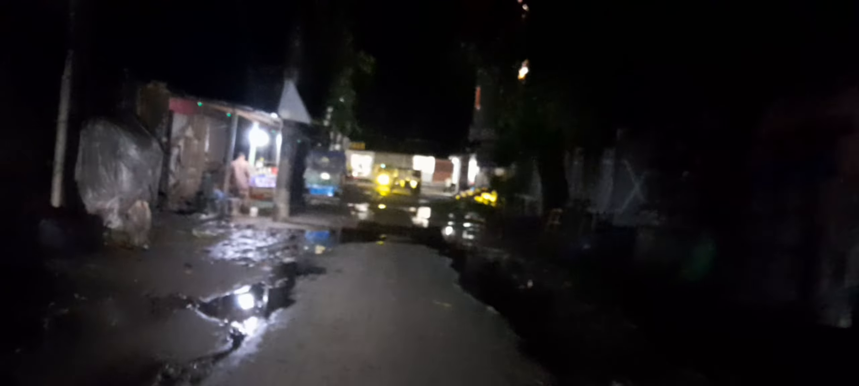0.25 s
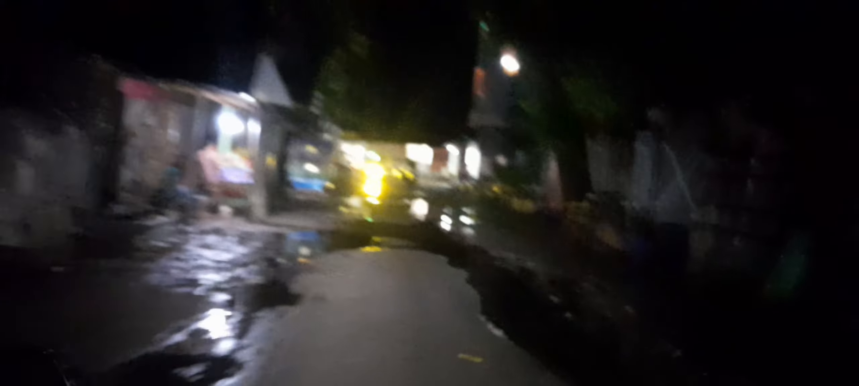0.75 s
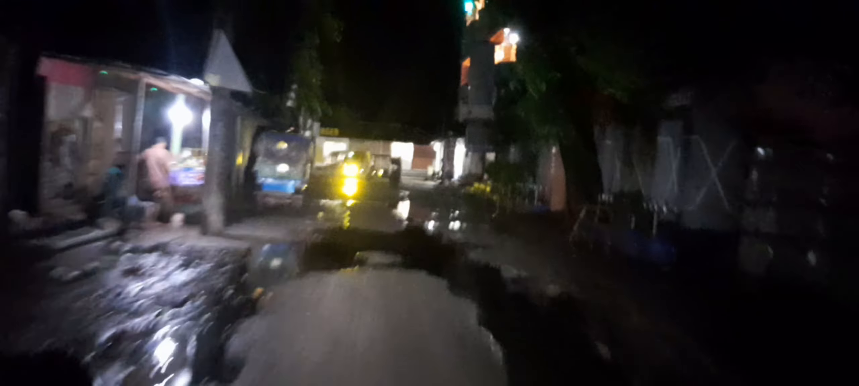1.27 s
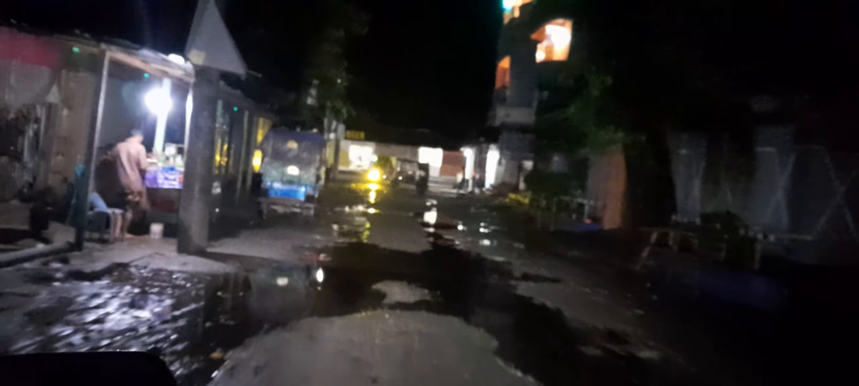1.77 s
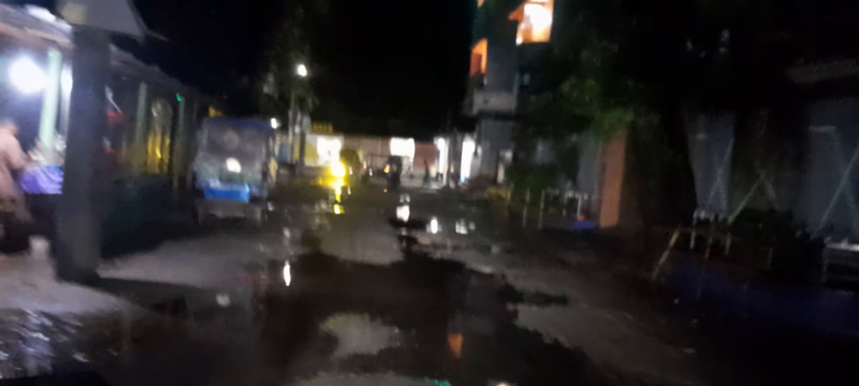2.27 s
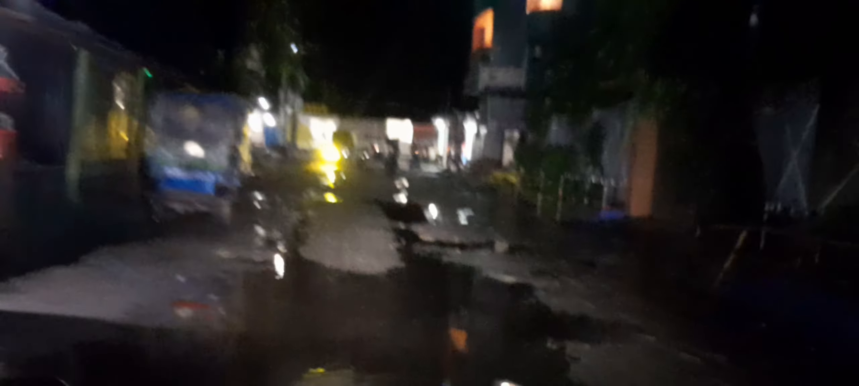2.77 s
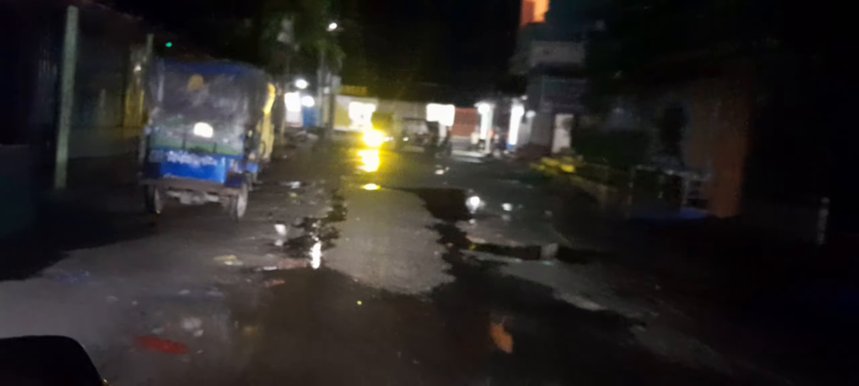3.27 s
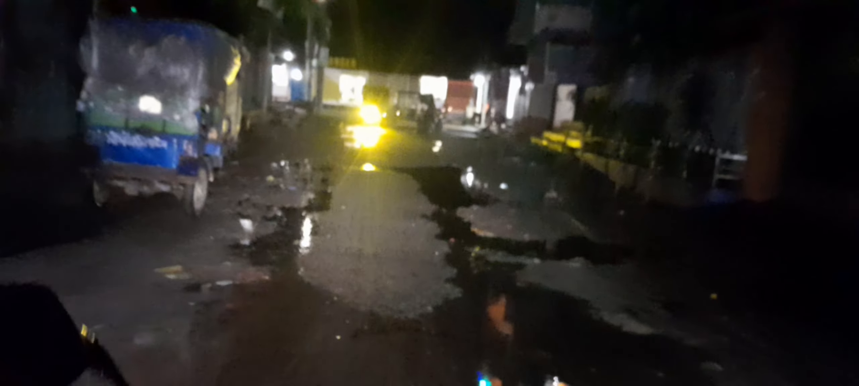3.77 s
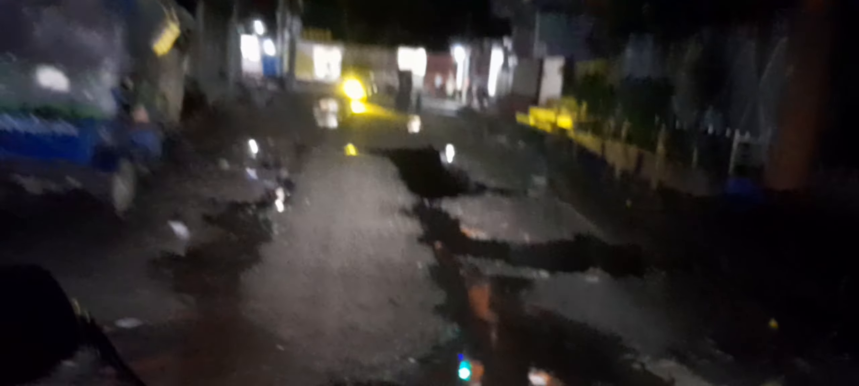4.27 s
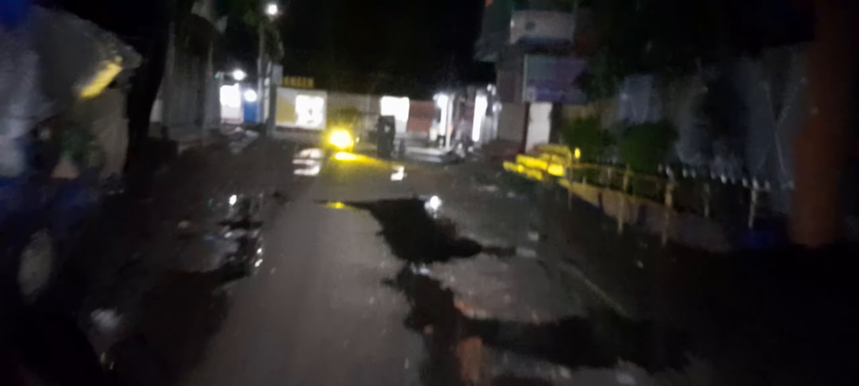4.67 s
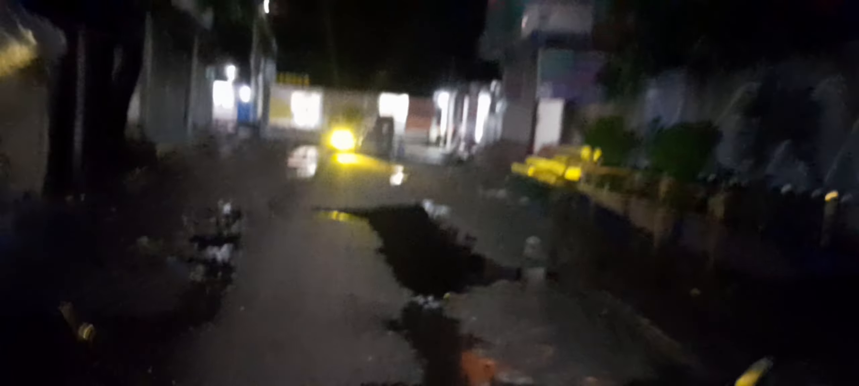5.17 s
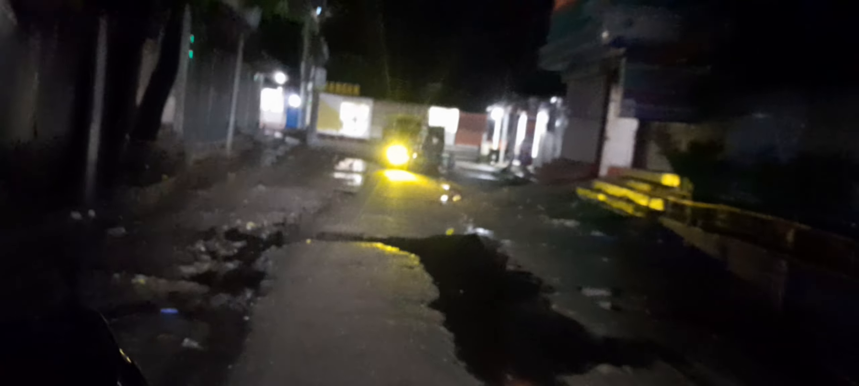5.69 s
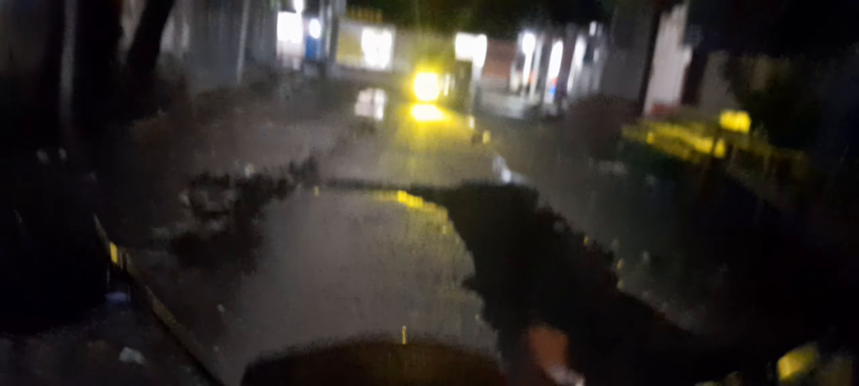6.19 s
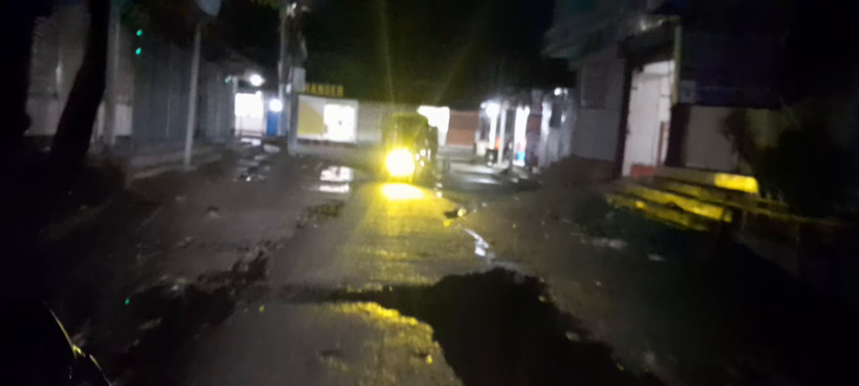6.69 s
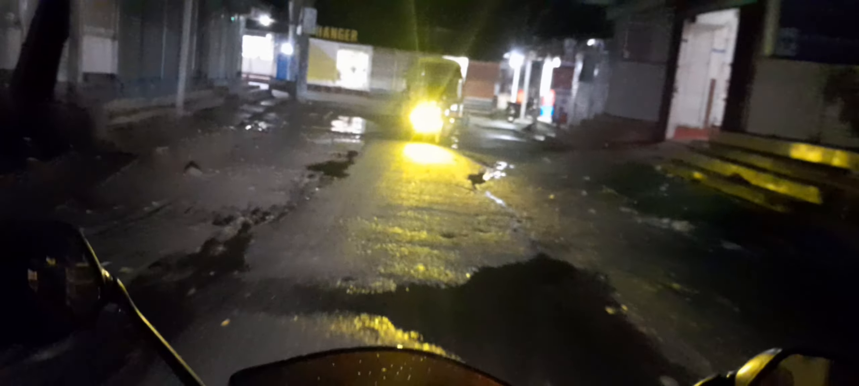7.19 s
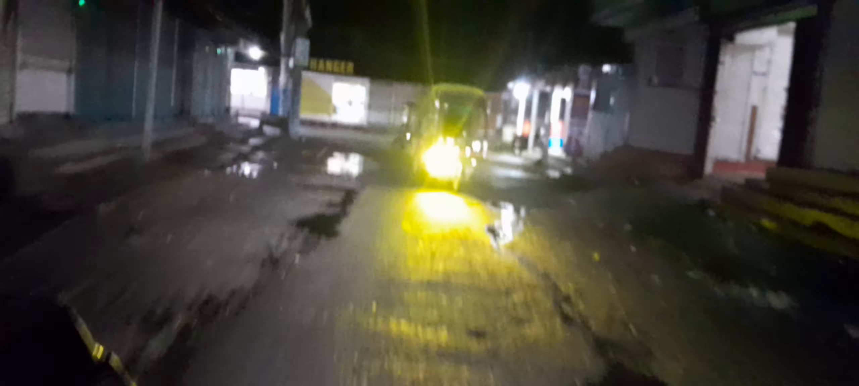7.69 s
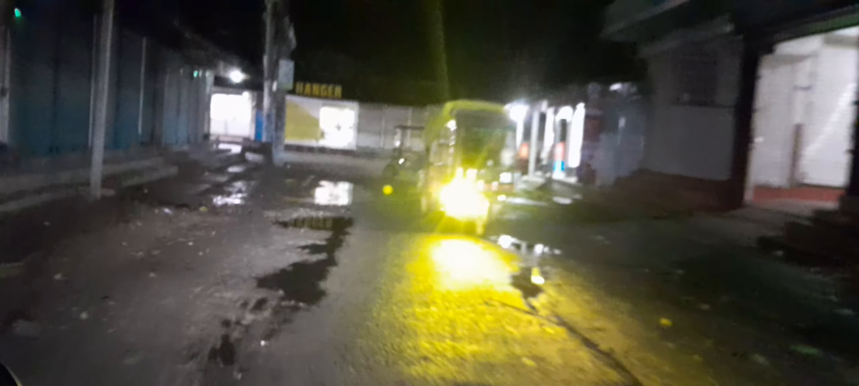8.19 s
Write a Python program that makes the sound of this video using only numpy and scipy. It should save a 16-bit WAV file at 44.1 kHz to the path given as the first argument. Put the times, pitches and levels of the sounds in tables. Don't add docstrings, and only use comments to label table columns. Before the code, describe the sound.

From the rider's helmet, a small single-cylinder motorcycle thuds along a wet, rough street. A puddle slap and suspension knocks come at once, then the engine sags, picks up, and drops to a slow uneven idle with jolts and rattles. It pulls again, then runs faster with whining gears and a buzzing panel, easing off at the end. Low wind gusts buffet both sides throughout.

```python
import sys
import numpy as np
from scipy import signal
from scipy.fft import rfft, irfft, next_fast_len
from scipy.io import wavfile
from scipy.ndimage import uniform_filter1d, map_coordinates

SR = 44100
rng = np.random.default_rng(int(sys.argv[2]) if len(sys.argv) > 2 else 0)


def volts_from_decibels(level):
    exponent = np.asarray(level, float) / 20
    return 10 ** exponent


def wrap_up_sound(samples):
    columns = np.atleast_2d(samples).T
    tamed = np.clip(columns, -1, 1)
    steps = np.round(tamed * 32767).astype(np.int16)
    wavfile.write(sys.argv[1], SR, steps)


N = 372233
T = np.arange(N) / SR

# (time [s], power strokes per second [Hz])
ENGINE_SPEED = [(0.0, 18.89), (0.25, 21.16), (0.64, 15.32), (1.07, 22.17), (2.1, 14.21), (2.41, 7.52),
                (2.97, 10.25), (3.13, 8.85), (3.82, 8.75), (4.04, 13.87), (4.8, 15.95), (5.79, 12.83),
                (6.18, 21.28), (6.82, 21.15), (7.53, 26.76), (7.71, 20.03), (8.19, 14.12), (8.44, 17.61)]
# (time [s], length [s], delay [ms], negative is early)
STROKE_SHIFTS = [(.11, .16, -12), (.72, .12, -12), (.965, .14, -14), (1.22, .2, 7), (1.37, .2, -10),
                 (2.784, .1, 9), (2.988, .1, -11), (3.43, .1, 20), (3.544, .1, -11), (4.047, .07, 12),
                 (4.118, .07, -13), (4.327, .07, 8), (4.47, .22, -4), (4.722, .07, 12), (4.848, .07, 5),
                 (4.97, .22, -12), (5.243, .07, 7), (5.6, .07, 12), (5.752, .07, 16), (5.961, .07, -24),
                 (6.25, .12, 10), (8.15, .2, -6)]
# (time [s], level [dB])
THROTTLE = [(0, -28.5), (.32, -28), (.5, -46), (.75, -25), (1.35, -27.5), (2.0, -37), (2.9, -38),
            (3.3, -39), (3.7, -34.5), (4.15, -29.5), (4.35, -25), (5.4, -28.5), (5.65, -36.5), (6.2, -25),
            (7.0, -34), (7.5, -28.5), (8.0, -31), (8.44, -28)]
# (time [s], length [s], change [dB])
MISFIRES = [(1.5, 0.19, -20), (1.8, 0.34, -19), (2.4, 0.36, -27), (2.49, .06, -10), (2.89, 0.14, -19),
            (3.53, 0.14, 7), (4.07, 0.056, 5), (3.2, 0.13, -14), (5.85, 0.12, 5.5), (4.8, 0.16, 3.5),
            (6.0, 0.16, -10), (6.08, .06, 0), (6.28, 0.096, 1), (7.56, 0.11, 8), (6.75, 0.23, -9),
            (7.35, 0.22, 0), (.89, .06, -6), (1.21, .1, 0), (8.43, .05, 4), (2.431, .06, 6),
            (3.317, .1, 5.5), (3.77, 0.091, 5.5), (3.97, .07, -15), (4.19, .07, -8), (4.258, 0.065, 5.5),
            (4.43, 0.15, 3), (4.52, .07, -1), (4.73, .07, -6), (4.905, .07, 3), (5.0, 0.17, -6),
            (5.108, .07, 2), (5.175, .07, -5), (5.898, 0.065, -17), (6.174, .05, -11), (6.55, .05, -2),
            (7.1, .05, -1), (7.145, .05, 8), (7.228, .05, -4)]
# (time [s], level [dB])
LOAD = [(0, 6), (.2, -2.5), (.56, -7), (.73, -0.5), (1.03, 3), (1.2, 1.5), (1.9, -5), (2.68, -8.5),
        (3.45, -3), (4.0, -2.5), (4.3, 4.5), (5.3, 4), (5.85, -1), (6.06, 1), (6.3, 7.5), (7.45, 6),
        (8.09, 0.5), (8.44, 2.5)]
# (time [s], level [dB])
WETNESS = [(0, -1), (.2, 6.5), (.3, -7), (.6, 3), (.9, 0), (2.0, 0), (3.3, -0.8), (3.45, 0.5), (4.4, -2),
           (5.3, 1), (6.0, 1.2), (8.44, 1.5)]
# (time [s], length [s], tank change [dB], frame change [dB])
JOLTS = [(.19, 0.3, 4, 3.5), (.8, 1, -1, -1), (1.55, 0.79, 6.5, 0), (1.87, 0.46, 11.5, 9),
         (2.62, 0.42, -6, -5.5), (3.0, 1, -2, -1.5), (3.5, 0.25, -6, -1.5), (3.9, 0.58, -3, -2),
         (4.31, 0.3, 8.5, 1), (4.8, 0.96, 8, 1), (5.15, 0.34, 0.5, -0.5), (5.5, 0.98, 3.5, 2.5),
         (6.18, 0.28, 6, 3), (6.45, 0.17, -1, 0.5), (6.9, 0.84, -1, -2), (7.62, 0.05, 10, 2.5),
         (7.8, 0.45, 6, 2), (8.15, 0.43, -1.5, 4.5), (8.42, 0.43, 7, -1), (.94, 0.18, -6, 1),
         (4.78, .2, -4, 0), (7.25, 0.55, 1, 1), (6.36, 0.11, -6, -3), (7.09, .08, -1, -3), (2.74, .1, 8, 7),
         (4.73, .06, 0, -6), (8.18, .1, -1, -0.5), (5.85, .35, 2, 4), (4.63, .3, -4, 0), (8.33, .25, 0, 4)]
# (frequency [Hz], width [Hz], level [dB])
SILENCER_MODES = [(56.7, 28, -5), (100.6, 44, 9), (112, 89, -42), (176, 81, -27)]
# (frequency [Hz], width [Hz], level [dB])
FRAME_MODES = [(197.3, 65, -1), (292.7, 119, 2), (376, 157, -7.5), (473.4, 143, 0.5)]
# (frequency [Hz], width [Hz], level [dB])
CASING_MODES = [(927, 218, 3.5), (1129, 170, 6), (1336, 167, 6.5), (1475, 140, 3), (1670, 250, -2.5)]
# (frequency [Hz], width [Hz], level [dB])
TANK_MODES = [(610, 66, -19), (702, 133, 20)]
# (frequency [Hz], width [Hz], level [dB])
FIN_MODES = [(2425, 140, -7), (3080, 83, 8.5), (3680, 150, 13.5), (4370, 440, 1), (5920, 270, 9)]
# (frequency [Hz], density [dB per Hz])
HISS_COLOUR = [(880, -7.5), (1500, -14.5), (1900, -6), (2340, -7.5), (2640, -8), (3730, -5), (4640, -7.5),
               (7030, -9.5), (7540, -10), (8740, -24.5), (12700, -22.5), (15100, -23), (16000, -67)]
# (frequency [Hz], density [dB per Hz])
SIZZLE_COLOUR = [(6500, -60), (8500, 0), (10500, 1), (13000, 4), (15000, 0.5), (15800, 0)]
# (time [s], strength [relative])
STONES = [(1.094, 5), (1.273, 4), (1.523, 5), (2.978, 4), (3.38, 5), (4.279, 5), (4.364, 4.5), (4.874, 4),
          (5.078, 6.5), (6.147, 5), (6.282, 7), (6.411, 3), (6.838, 5), (6.973, 6), (7.105, 4), (7.35, 4),
          (7.389, 4)]
# (time [s], level at each port [dB])
AIRFLOW = [(0, -25.5), (.14, -34.5), (1.3, -34), (2.4, -32), (2.9, -39), (3.6, -37), (4.3, -31),
           (5.7, -33.5), (5.95, -38.5), (6.3, -33.5), (7.4, -31), (7.6, -42.5), (8.1, -41), (8.44, -39)]
# (time [s], length [s], change [dB], left-right difference [dB])
GUSTS = [(.33, 0.23, 13.5, -3.5), (.43, 0.22, 9, -9), (.85, 0.13, -6, -32.5), (1.0, .15, 0, -1),
         (1.12, 0.28, -0.5, 1), (1.27, .15, -1, -1), (1.4, 0.24, 5, -9), (1.56, 0.19, 12.5, -6),
         (1.72, 0.58, 1.5, 3), (1.87, 0.24, 6.5, -3), (2.0, 0.23, 3, -9), (2.43, 0.044, 10.5, -4),
         (2.66, 0.18, 3, -6), (2.49, 0.047, -14, -4), (2.94, 0.082, 1.5, -7), (3.36, 0.33, 5, 1),
         (3.52, 0.11, 4.5, -11), (3.92, 0.36, 1, -3), (4.06, 0.11, -1, -3), (4.65, 0.21, -3.5, -7),
         (4.9, 0.41, 5.5, -0.5), (5.22, 0.25, -5.5, 11), (5.46, 0.12, -0.5, -6), (5.74, .15, -3.5, 6),
         (5.88, .15, 1, -10), (6.41, 0.079, 8, -6), (6.46, 0.089, 0, -6), (7.15, 0.32, 0, -8),
         (7.7, .15, 5, -16), (7.9, 0.33, 2, 4), (4.85, 0.1, -3, -1), (3.68, 0.11, -4, -2),
         (2.62, 0.049, -3, -4), (8.2, .12, -2, .1), (1.65, 0.053, 5, .1)]
# (frequency [Hz], density [dB per Hz])
WIND_COLOUR = [(18, -33), (30, -3.5), (91, -2.5), (351, -13), (390, -17), (473, -18), (517, -21.5),
               (2000, -54), (2600, -84), (4400, -120)]
# (time [s], slap level [dB], slap 60 dB fall [s], spray level [dB], spray 60 dB fall [s])
PUDDLES = [
    (0.2219, -9.5, 0.047, -20, 0.7),
    (0.454, -21, 0.027, -34.5, 0.38),
    (6.281, -43, 0.044, -35, 0.5),
]
# (frequency [Hz], density [dB per Hz])
SLAP_COLOUR = [(500, -30), (1500, -41), (5000, 13), (9000, -5), (16000, -6)]
# (frequency [Hz], density [dB per Hz])
SPRAY_COLOUR = [(470, -41), (800, -6), (2350, 1), (2980, -3), (3690, 0), (6170, 3.5), (7700, -3),
                (8300, -10.5), (16000, -17)]
# (time [s], level [dB], pitch [Hz], 60 dB fall [s], left-right difference
# [dB])
THUMPS = [(.403, -14, 100, .1, -4), (0.426, -0.5, 88, 0.033, -9), (0.829, -16.5, 107, 0.12, -1),
          (4.658, -18, 105, 0.21, 0), (2.193, -18, 110, .05, 0), (1.546, -10.5, 95, 0.084, 4),
          (1.867, -21, 604, 0.054, 9), (1.92, -9.5, 590, 0.014, -13), (4.071, -24.5, 1350, 0.03, 5),
          (4.279, -15.5, 294, 0.2, -1), (5.681, -25, 3370, 0.035, 5), (6.287, -28, 5080, 0.07, 7),
          (7.607, -13.5, 1183, 0.1, 7), (7.61, -8, 92, 0.18, 1.5), (.311, -12, 105, .05, 1),
          (.362, -8, 170, .03, 0), (1.612, -8, 110, .06, 3), (1.831, -13, 120, .05, 8),
          (1.848, -13, 130, .04, 6), (1.877, -13, 140, .05, 3), (1.926, -8.5, 170, .035, 2),
          (1.994, -11, 125, .035, 3), (.372, -14, 100, .06, 0), (1.871, -22, 1090, 0.028, 5),
          (1.535, -34, 580, .1, 3), (2.95, -46, 4150, .05, 2), (2.98, -43, 4100, .07, 2),
          (2.985, -42, 3100, .04, 2), (3.373, -42.5, 2320, 0.1, 2), (3.405, -43, 3050, .05, 2),
          (3.435, -38, 3750, .03, 2), (.22, -9.5, 130, 0.041, 2), (4.553, -39, 13000, .04, 0),
          (3.02, -45, 4200, .07, 2), (0.37, -14.5, 250, 0.045, -2)]
# (time [s], level [dB], pitch [Hz], 60 dB fall
# [s], left-right difference [dB])
RATTLES = [(.34, -18, 177, 0.095, -21), (1.6, -19, 600, 0.06, -5), (1.82, -25, 247, 0.11, 13),
           (1.991, -25, 249, 0.035, 3), (2.424, -21, 276, 0.056, 0), (3.29, -25, 383, 0.032, 2),
           (4.271, -19, 360, 0.15, 2), (3.371, -46, 3000, 0.18, 5), (4.166, -23, 800, 0.047, 3),
           (4.651, -22, 900, 0.05, 3), (7.604, -19, 450, 0.07, 4), (7.731, -29, 3400, 0.078, 3),
           (.9, -27, 290, .08, 2), (.94, -21, 290, .07, 2), (.98, -13, 260, 0.065, 1),
           (3.735, -33, 1090, .05, 1), (3.911, -30, 1200, .04, 1), (4.201, -20, 520, .04, 2),
           (4.885, -30, 660, 0.037, 1), (5.088, -16, 434, 0.067, 1), (5.185, -24, 530, 0.055, -1),
           (5.362, -21.5, 507, .06, -3), (5.44, -28, 350, .05, 1), (6.096, -30, 1480, .06, 2),
           (6.146, -27, 1500, 0.056, 2), (.222, -16, 14000, .015, 1), (5.68, -29.5, 3400, .05, 3),
           (.352, -25, 600, .04, 0), (1.565, -23, 400, 0.06, 0), (8.405, -20.5, 330, .08, 3),
           (.95, -24, 200, .16, 0), (8.3, -26, 400, .12, 1), (8.155, -26, 290, .08, 2),
           (3.725, -24, 290, .05, 0), (4.236, -21, 320, .05, 1)]
# (time [s], length [s], from [Hz], to [Hz], level [dB])
GEAR_NOTES = [
    (.72, .1, 1450, 1420, -47),
    (1.0, .06, 1105, 1095, -44),
    (1.09, .08, 955, 925, -47),
    (1.3, .08, 950, 945, -45),
]
# (time [s], length [s], from [Hz], to [Hz], level [dB])
GEAR_PARTNERS = [
    (6.42, 0.245, 1310, 1325, -45),
    (6.59, .05, 990, 1300, -45),
    (6.22, 0.045, 1305, 1600, -40),
    (6.88, .04, 1300, 1290, -46),
    (5.7, 0.048, 1300, 1320, -43.5),
    (0.89, .14, 1300, 1330, -49),
    (1.22, 0.13, 1430, 1390, -51),
    (4.4, 0.506, 710, 690, -44),
    (5.1, 0.46, 620, 560, -43.5),
]
# (time [s], pitch [Hz], level [dB])
GEAR_MESH = [(6.15, 1010, -50), (6.27, 1000, -46), (6.37, 980, -47), (6.42, 955, -36), (6.55, 935, -40),
             (6.8, 950, -38.5), (6.95, 975, -41), (7.06, 1050, -45), (7.15, 1075, -46), (7.2, 1095, -38),
             (7.33, 1120, -36), (7.46, 1120, -35.5), (7.57, 1090, -56)]
# (time [s], length [s], from [Hz], to [Hz], level [dB])
DRONES = [
    (0.867, 0.14, 282.8, 296.3, -38),
    (1.146, 0.35, 267.7, 290, -35.5),
    (6.197, 0.2, 268, 282.4, -32.5),
    (7.005, 0.42, 273.8, 309.6, -32.5),
    (7.543, 0.075, 310.2, 308, -41),
]
# (time [s], length [s], from [Hz], to [Hz], level [dB])
BOOMS = [
    (1.066, 0.15, 114, 112, -18.5),
    (1.274, 0.15, 112, 112, -19),
    (6.552, 0.44, 101, 112, -24.5),
    (7.076, 0.177, 115, 121.3, -20.5),
    (7.325, 0.082, 125, 128, -22),
]
# (time [s], length [s], level [dB])
PANEL_BUZZES = [
    [(6.41, .18, -42), (6.685, .1, -39.5), (6.77, .07, -49), (6.835, .09, -44), (7.0, .13, -35),
     (7.11, .14, -47), (6.8, 1.4, -47)],
    [(6.45, .25, -51), (6.87, .24, -47), (7.35, .1, -49)],
]


def rms_one(x):
    return x / np.sqrt(np.mean(x ** 2) + 1e-20)


def in_time(rows, outside=None):
    times, *columns = np.transpose(rows)
    return [np.interp(T, times, column, outside, outside) for column in columns]


def swells(rows):
    out, coarse = 0, T[::64]
    for s, length_s, *sizes in rows:
        hump = np.cos(np.pi * np.clip((coarse - s) / length_s, -.5, .5)) ** 2
        out = out + np.outer(sizes, hump)
    return [np.interp(T, coarse, column) for column in out]


def drift(rate):
    knots = rng.standard_normal(400)
    return rms_one(map_coordinates(knots, [np.minimum(T * rate, 390)], order=3))


def resonate(x, hz, width_hz):
    r = np.exp(-np.pi * width_hz / SR)
    feedback = [1, -2 * r * np.cos(2 * np.pi * hz / SR), r * r]
    return signal.lfilter([(1 - r * r) / 2, 0, (r * r - 1) / 2], feedback, x)


def body(x, modes, patchy_db=np.zeros(1)):
    total = 0
    for k, (hz, width_hz, db) in enumerate(modes):
        ringing = resonate(resonate(x, hz, width_hz), hz, width_hz)
        total = total + (-1) ** k * volts_from_decibels(db + np.roll(patchy_db, k * SR)) * ringing
    return rms_one(total)


def coloured(spectrum, alike):
    hz, db = np.transpose(spectrum)
    size = next_fast_len(N)
    gain = volts_from_decibels(np.interp(np.log(np.fft.rfftfreq(size, 1 / SR) + 1), np.log(hz), db))
    mid, side = irfft(rfft(rng.standard_normal((2, size))) * gain, size)[:, :N]
    return rms_one(np.sqrt(1 + alike) * mid + np.sqrt(1 - alike) * side * [[1], [-1]])


def panned(x, pan_db):
    return x * volts_from_decibels(np.multiply.outer([.5, -.5], pan_db * np.ones(N)))


def evened(x, span_s):
    span = int(span_s * SR)
    power = uniform_filter1d(uniform_filter1d(x ** 2, span), span)
    return x / np.sqrt(power + 1e-6)


def whine(rows, wobble_hz, flutter_db):
    hz, _ = in_time(rows)
    _, level_db = in_time(rows, -120)
    phase = 2 * np.pi * np.cumsum(hz + wobble_hz * drift(25)) / SR
    return np.sqrt(2) * volts_from_decibels(level_db + flutter_db * drift(22)) * np.sin(phase)


def glides(rows, wobble_hz, flutter_db):
    attack_s, release_s = 0.13, 0.033
    total = 0
    for s, length_s, from_hz, to_hz, level_db in rows:
        end = s + length_s
        path = [(s - attack_s, from_hz, level_db - 28), (s, from_hz, level_db),
                (end, to_hz, level_db), (end + release_s, to_hz, level_db - 29)]
        total = total + whine(path, wobble_hz, flutter_db)
    return total


def firings(jitter_s, uneven_db):
    strokes = np.cumsum(in_time(ENGINE_SPEED)[0]) / SR - .44
    count = np.arange(int(strokes[-1]) + 1)
    chance = np.clip(rng.standard_normal((len(count), 2)), -2, 2)
    at = np.interp(count, strokes, T) - .011 + jitter_s * chance[:, 0]
    at = at + np.interp(at + .011, T, swells(STROKE_SHIFTS)[0]) / 1000
    heard = at < T[-1]
    clicks = np.full(N, 1e-18)
    clicks[(at[heard] * SR).astype(int)] = volts_from_decibels(uneven_db * chance[heard, 1])
    return clicks


def puff(clicks, t60, floor):
    r = volts_from_decibels(-60 / (t60 * SR))
    swell = signal.lfilter([1 - r], [1, -r], signal.lfilter([1], [1, -r], clicks))
    return rms_one(floor + rms_one(swell))


def earlier(clicks, lead_s):
    return np.roll(clicks, -int(lead_s * SR))


def efforts():
    throttle, = in_time(THROTTLE)
    load, = in_time(LOAD)
    wet, = in_time(WETNESS)
    tank, frame = swells(JOLTS)
    thud_db = throttle + swells(MISFIRES)[0]
    bark_db = -36 + 0.59 * load + frame
    clatter_db = -43 + load + 0.06 * tank
    hiss_db = -43.5 + 0.93 * load + wet
    tank_db = -49 + 0.75 * load + tank
    return thud_db, bark_db, clatter_db, hiss_db, tank_db


def exhaust_thud(clicks):
    turbulence = puff(clicks, t60=0.092, floor=0.2) * rng.standard_normal(N)
    echo = 0.31 * volts_from_decibels(0.78 * drift(15.0)) * np.roll(clicks, int(0.0357 * SR))
    low_pass = signal.butter(2, 160, fs=SR, output="sos")
    push = signal.sosfilt(low_pass, rms_one(clicks + echo) + .25 * turbulence)
    return evened(body(push, SILENCER_MODES), span_s=0.16)


def shaken_metal(clicks, bark_db, clatter_db, tank_db):
    middle, side = rng.standard_normal((2, N))
    wide = middle + 0.5 * side * [[1], [-1]]
    bark_in = 0.3 * rms_one(clicks) + puff(earlier(clicks, .018), t60=0.085, floor=1.05) * wide
    bark = body(bark_in, FRAME_MODES, patchy_db=1.5 * drift(14))
    clatter_in = puff(earlier(clicks, .022), t60=.12, floor=1.05) * wide
    clatter = body(clatter_in, CASING_MODES, patchy_db=1.5 * drift(16))
    tank = body(puff(earlier(clicks, .016), t60=0.051, floor=1.0) * wide[:, ::-1], TANK_MODES)
    return volts_from_decibels(bark_db) * bark + volts_from_decibels(tank_db) * tank + panned(volts_from_decibels(clatter_db) * clatter, 1.54)


def chain_and_wet_tyres(clicks, hiss_db):
    hiss = coloured(HISS_COLOUR, alike=0.024) * puff(earlier(clicks, .022), t60=0.02, floor=5.0)
    hiss = hiss * volts_from_decibels(0.48 * drift(7) + 0.9 * drift(29))
    hits = rng.random(N) < 40 * volts_from_decibels(hiss_db + 42) / SR
    ticks = hits * volts_from_decibels(5.5 * np.minimum(rng.exponential(1, N), 1.6))
    stone_s, strength = np.transpose(STONES)
    ticks[(stone_s * SR).astype(int)] = strength
    grit = signal.lfilter([1], [1, -.992], ticks)
    sizzle_db = -57 + 0.38 * (hiss_db + 46.5)
    sizzle = volts_from_decibels(sizzle_db) * coloured(SIZZLE_COLOUR, alike=0.055) * (1 + 0.45 * grit)
    return panned(volts_from_decibels(hiss_db) * hiss * (1 + .12 * grit), 1.54) + panned(sizzle, 0.46)


def cooling_fins(level_db):
    noise = rng.standard_normal((2, N))
    ring = sum(volts_from_decibels(db + 3.0 * drift(7)) * body(noise, [(hz, width_hz, 0)])
               for hz, width_hz, db in FIN_MODES)
    return panned(volts_from_decibels(level_db) * ring, 1.54)


def engine(clicks):
    thud_db, bark_db, clatter_db, hiss_db, tank_db = efforts()
    out = volts_from_decibels(thud_db) * exhaust_thud(clicks) + shaken_metal(clicks, bark_db, clatter_db, tank_db)
    return out + chain_and_wet_tyres(clicks, hiss_db) + cooling_fins(hiss_db - 30)


def wind():
    gust_db, pan_db = swells(GUSTS)
    level_db = in_time(AIRFLOW)[0] + gust_db
    lumps = np.tanh([.5 * drift(16) + .5 * drift(40) for port in range(2)])
    noise = coloured(WIND_COLOUR, alike=0) * volts_from_decibels(7.6 * lumps)
    dull = signal.sosfilt(signal.butter(2, 220, fs=SR, output="sos"), noise)
    bright = np.clip((level_db + 44.0) / 12, 0, 1)
    return panned(volts_from_decibels(level_db + 2.5) * rms_one(dull + bright * (noise - dull)), 4 + pan_db)


def splashes():
    slap, spray = np.zeros((2, N))
    for s, slap_db, slap_t60, spray_db, spray_t60 in PUDDLES:
        after = np.maximum(T - s, 0)
        slap += (1 - np.exp(-after / 0.0017)) * volts_from_decibels(slap_db - 60 * after / slap_t60)
        spray += (T >= s) * volts_from_decibels(spray_db - 60 * after / spray_t60)
    patter = coloured(SPRAY_COLOUR, alike=.05) * spray * volts_from_decibels(.4 * drift(45))
    return panned(coloured(SLAP_COLOUR, alike=.2) * slap + patter, 2.0)


def struck(rows, noisy, rise_s):
    out, t = np.zeros((2, N)), np.arange(int(.2 * SR)) / SR
    for s, level_db, hz, t60, pan_db in rows:
        noise = body(rng.standard_normal(len(t)), [(hz, 1.17 * hz, 0)])
        ring = (1 - noisy) * np.sin(2 * np.pi * hz * t) + noisy * noise
        ring = ring * volts_from_decibels(level_db - 60 * t / t60) * (1 - np.exp(-t / rise_s(hz)))
        i = int(s * SR)
        out[:, i:i + len(t)] += ring[:N - i] * volts_from_decibels(np.array([[.5], [-.5]]) * pan_db)
    return out


def knocks():
    thumps = struck(THUMPS, noisy=.08, rise_s=lambda hz: .0012)
    return thumps + struck(RATTLES, noisy=0.6, rise_s=lambda hz: .004 * (hz < 2000) + 0.00087)


def gears():
    mesh = whine(GEAR_MESH, wobble_hz=7.0, flutter_db=1.2)
    notes = glides(GEAR_NOTES, wobble_hz=8.0, flutter_db=2.0)
    return mesh + notes + glides(GEAR_PARTNERS, wobble_hz=12.0, flutter_db=3.0)


def intake_drone():
    return glides(DRONES, wobble_hz=1.5, flutter_db=.4)


def silencer_boom():
    return volts_from_decibels(-6.5) * glides(BOOMS, wobble_hz=1.28, flutter_db=2.0)


def panel():
    out, shake = 0, rng.standard_normal((2, N))
    for hz, rows in zip((3262, 2855), PANEL_BUZZES):
        steady = [(0, hz, 0), (T[-1], hz, 0)]
        middle, side = [whine(steady, wobble_hz=17.0, flutter_db=1.2) for part in range(2)]
        level, = swells([(s, length_s, volts_from_decibels(db)) for s, length_s, db in rows])
        rough = body(shake, [(hz, 60, 0)]) + volts_from_decibels(-2) * body(shake[::-1], [(hz, 600, 0)])
        out = out + level * (.85 * (middle + .7 * side * [[1], [-1]]) + .6 * rough)
    return out


def scene():
    clicks = firings(jitter_s=.0012, uneven_db=1.8)
    load = puff(clicks, t60=.09, floor=.35)
    bite = puff(clicks, t60=.055, floor=.15)
    out = engine(clicks) + wind() + splashes() + knocks()
    out = out + panned(bite * gears() + (0.45 + 0.55 * load) * intake_drone(), 1.8)
    return out + (0.62 + 0.24 * load) * silencer_boom() + panel()


def roll_off(x):
    return signal.sosfilt(signal.butter(12, 15800, fs=SR, output="sos"), x)


def record(dry):
    dry = signal.sosfilt(signal.butter(4, 42, "high", fs=SR, output="sos"), dry)
    dry = signal.sosfilt(signal.ellip(10, .5, 60, 15800, fs=SR, output="sos"), dry)
    return roll_off(dry)


dry = scene()
out = record(dry)
wrap_up_sound(out)
```